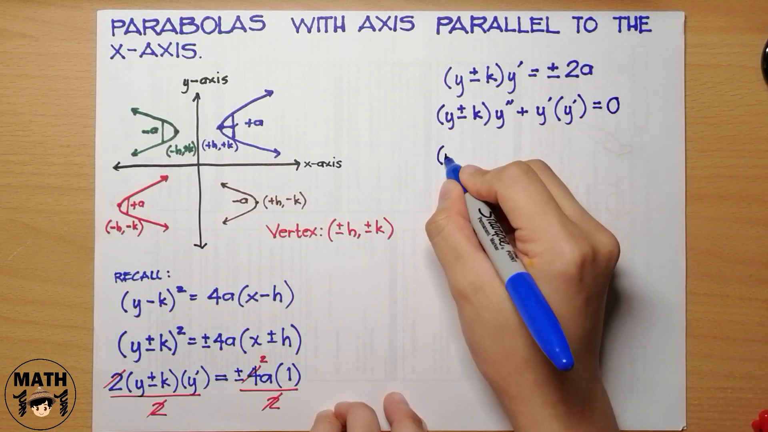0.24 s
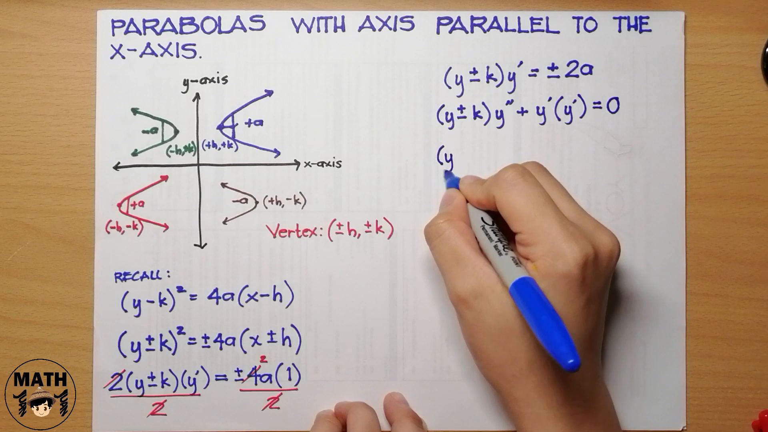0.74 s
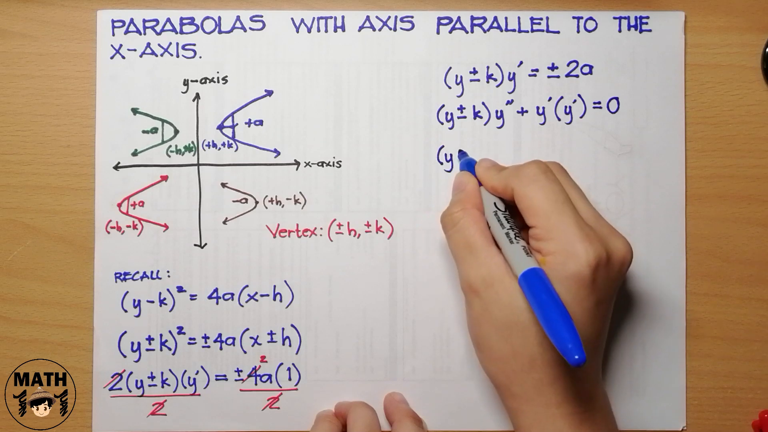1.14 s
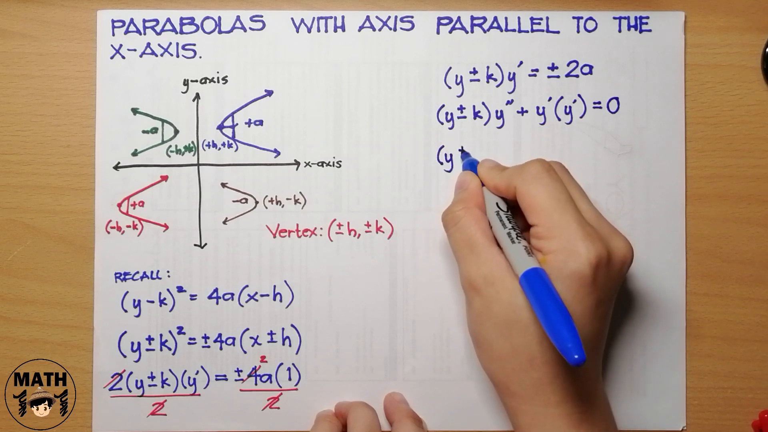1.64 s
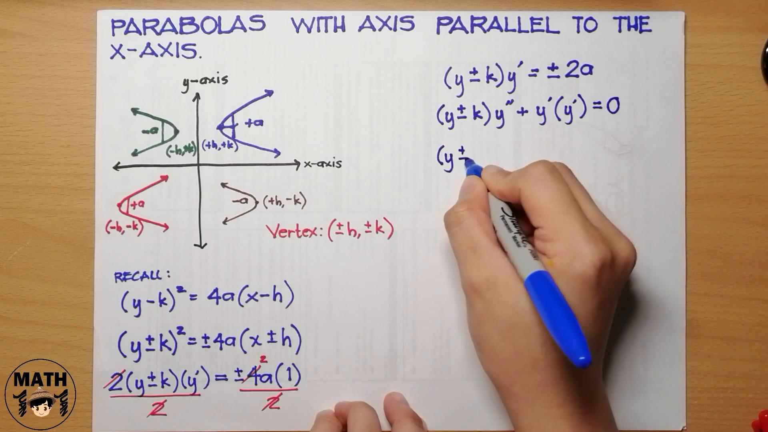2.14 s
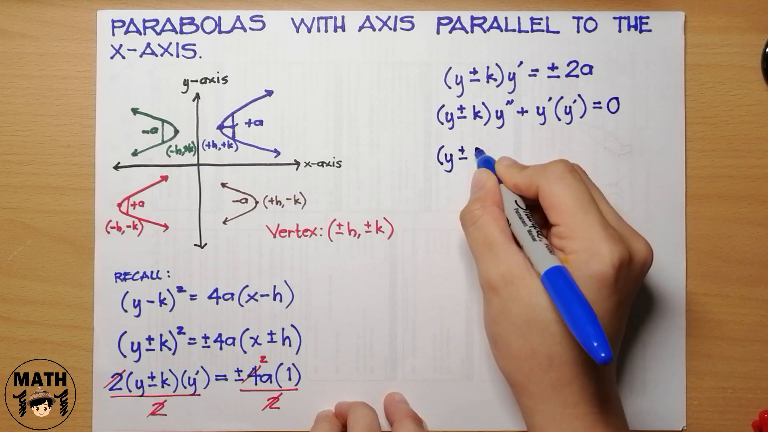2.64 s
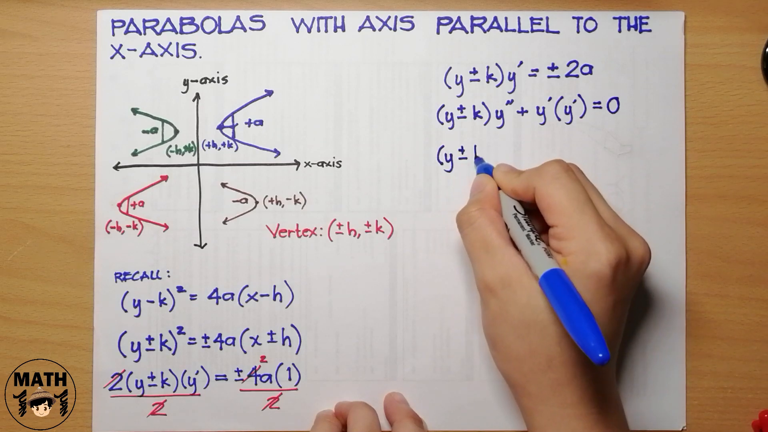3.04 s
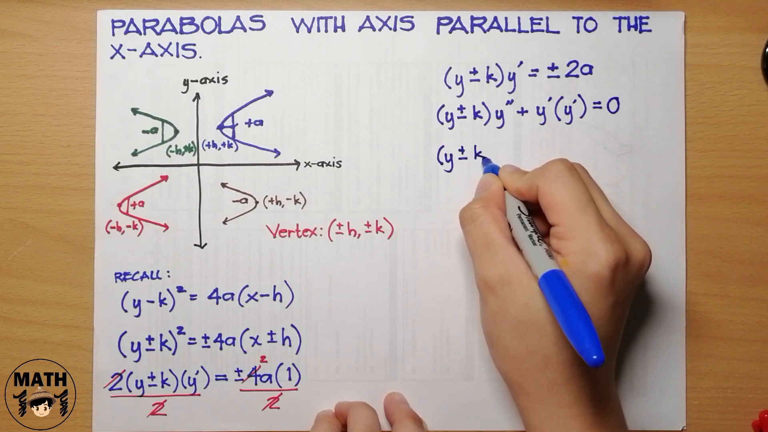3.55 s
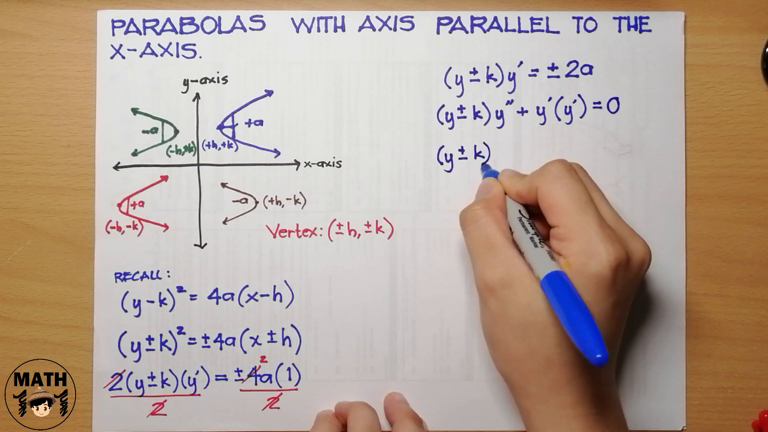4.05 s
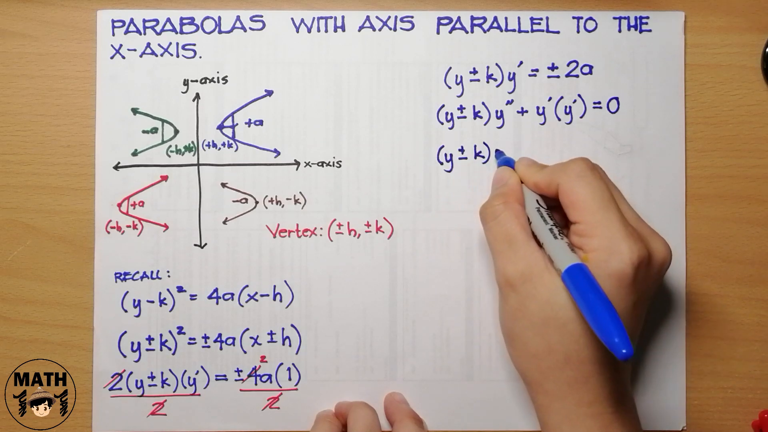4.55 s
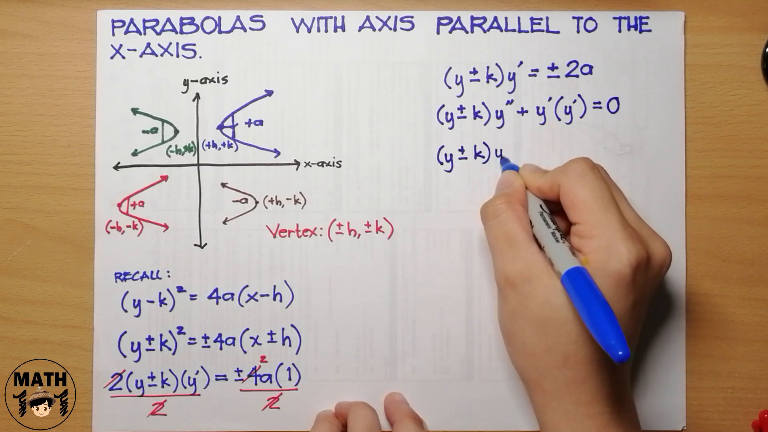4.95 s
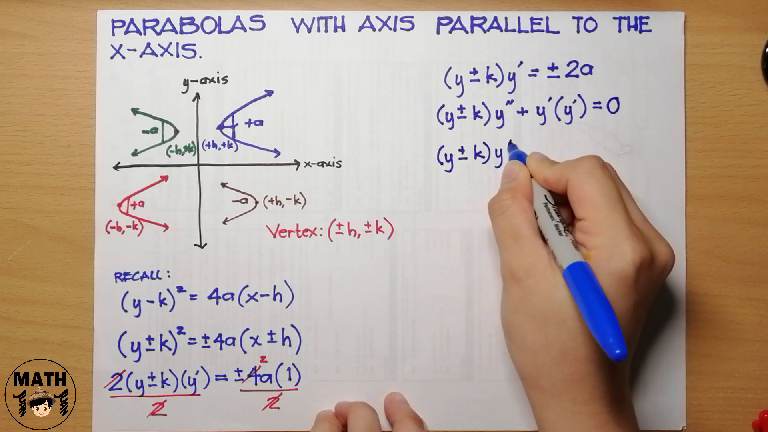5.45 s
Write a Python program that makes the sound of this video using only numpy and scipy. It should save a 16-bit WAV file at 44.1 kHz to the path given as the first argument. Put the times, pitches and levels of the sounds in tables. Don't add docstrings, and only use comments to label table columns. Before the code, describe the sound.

A felt-tip marker makes short, dry, scratchy strokes on paper over a desk, with small ticks, soft hand thumps and a low steady hum.

```python
import sys
import numpy as np
from scipy import signal
from scipy.fft import rfft, irfft, next_fast_len
from scipy.io import wavfile
from scipy.ndimage import uniform_filter1d, map_coordinates

SR = 44100
rng = np.random.default_rng(int(sys.argv[2]) if len(sys.argv) > 2 else 0)


def inscribe(sig):
    pcm = np.round(np.clip(np.atleast_2d(sig).T, -1, 1) * 32767)
    wavfile.write(sys.argv[1], SR, pcm.astype(np.int16))


def boost_factor(decibels):
    exponent = np.asarray(decibels, float) / 20
    return 10 ** exponent


N = 250652


def unit(x):
    return x / np.sqrt(np.mean(x ** 2) + 1e-20)


def along(points, hz):
    f, level_db = np.transpose(points)
    return boost_factor(np.interp(np.log(hz + 1), np.log(f + 1), level_db))


def wobble(rate):
    knots = rng.standard_normal(int(N * rate / SR) + 4)
    return map_coordinates(knots, [np.arange(N) * rate / SR])


def filtered(x, response):
    m = next_fast_len(N + SR // 2)
    return irfft(rfft(x, m) * response(np.fft.rfftfreq(m, 1 / SR)), m)[..., :N]


def modes(table, f):
    return sum(boost_factor(db) * 1j * f * w / (c * c - f * f + 1j * f * w) for c, w, db in table)


# (frequency [Hz], width [Hz], level [dB])
BARREL_MODES = [(532.6, 19, -4), (750, 89, -2.5), (1099, 36, 1.5), (1306, 26, 1), (1400, 53, -0.5),
                (1714, 50, -1), (2134, 160, -1.5), (2515, 18, -2.5), (3052, 310, -3.5), (3330, 97, -5.5),
                (4265, 68, -4.5)]
# (frequency [Hz], level [dB])
BROAD_SCRAPE = [(400, -37.5), (700, -1.5), (1500, -11), (2500, -16.5), (3800, -7), (5000, -51), (8000, -22)]


def barrel(f):
    return modes(BARREL_MODES, f) + along(BROAD_SCRAPE, f)


# (frequency [Hz], density [dB per Hz])
FELT_SPECTRUM = [(2500, -30), (3500, -3), (4400, -1.5), (4850, -16.5), (5450, -2.5), (5900, -13.5),
                 (6500, -1.5), (8000, -10), (8700, -3), (10500, -7.5), (13500, -7), (14500, -13),
                 (15600, -7.5)]


def felt(f):
    return along(FELT_SPECTRUM, f)


def fibres(spread_db, clump_db, patchy_db):
    clumping = clump_db * wobble(180) + clump_db * wobble(40)
    size = boost_factor(spread_db * rng.exponential(size=N) + clumping)
    spectrum = signal.stft(size * rng.standard_normal(N), nperseg=512)[2]
    patches = uniform_filter1d(rng.standard_normal(spectrum.shape), size=3, axis=0)
    patches = uniform_filter1d(patches, size=9, axis=1)
    return unit(signal.istft(spectrum * boost_factor(patchy_db * unit(patches)), nperseg=512)[1][:N])


# (start [s], length [s], pressure [dB], speed at start [dB], speed at end [dB])
STROKES = [(-.02, .095, -59.5, 1.5, 6), (0.077, 0.098, -58, 0.5, -12), (0.665, 0.06, -58, -11, -5),
           (0.721, 0.08, -61, -3, -18), (0.798, .035, -59.5, -5.5, 9), (.835, 0.097, -62, 10.5, -9),
           (1.011, 0.11, -55.5, -6.5, 1), (1.122, 0.046, -54.5, 1.5, 4.5), (1.181, 0.027, -56, 10, 13.5),
           (1.721, 0.06, -55.5, -1.5, -19), (2.081, 0.077, -59, -4, -4), (2.46, 0.074, -55, 10.5, -3),
           (2.651, 0.058, -68, 4.5, -8), (3.299, 0.054, -58, -8, 1.5), (3.353, 0.078, -58.5, 5.5, -15),
           (3.672, 0.074, -64, 9, -1.5), (3.853, 0.056, -58.5, -13, -3), (3.909, 0.058, -57, 0.5, -14.5),
           (4.279, 0.072, -57.5, -13, -11), (4.328, 0.162, -57.5, -8, 9.5), (5.086, 0.098, -58, -0.5, -16),
           (5.188, 0.12, -63, 7.5, -2), (5.356, 0.08, -58, -9, -3.5), (5.434, 0.12, -60, -4.5, 12.5)]
# (time [s], upright [dB], grip [dB])
HOLD = [(0, 11.5, -5), (.07, -0.5, -3.5), (.18, 2, 3), (.7, 6, -2), (.84, 0, 3), (1.16, -2, -7),
        (1.2, 3, 8), (2.12, 5, 2.5), (2.5, -0.5, 2.5), (3.34, -2.5, 1), (3.4, 4, 2), (3.93, 2, 3.5),
        (4.31, 2, 4), (4.45, -7, -4.5), (5.1, 1.5, 1.5), (5.25, 2, 3), (5.42, -5, 1), (5.56, 0.5, 1.5)]
LAND_S, LIFT_S = 0.023, 0.019
LAND_SHORTENS, LAND_BEND = 0.36, 0.82
LOW_DB, UPPER_DB = -6, -6.5
LOW_GROWS, SCRAPE_GROWS, UPPER_GROWS = 0.13, 0.33, 0.32
FELT_DB = -63.5


def stroke_gains():
    t, gains = np.arange(N) / SR, np.zeros((4, N))
    hold_s, upright, grip = np.transpose(HOLD)
    upright_db = np.interp(t, hold_s, upright)
    grip_db = np.interp(t, hold_s, grip)
    for start, length, pressure_db, first_db, last_db in STROKES:
        land_s = LAND_S * boost_factor(-LAND_SHORTENS * first_db)
        land = np.clip((t - start) / land_s, 0, 1) ** LAND_BEND
        lift = np.clip(1 - (t - start - length) / LIFT_S, 0, 1)
        speed_db = np.interp(t, [start, start + length], [first_db, last_db])
        low_db = pressure_db + LOW_DB + LOW_GROWS * speed_db + upright_db
        middle_db = pressure_db + SCRAPE_GROWS * speed_db
        upper_db = pressure_db + UPPER_DB + UPPER_GROWS * speed_db + grip_db
        gains += land * lift * boost_factor((low_db, middle_db, upper_db, FELT_DB + speed_db))
    return gains


# (frequency [Hz], width [Hz], level [dB])
HISS_MODES = [(6860, 180, -11), (7910, 140, 0.5), (8670, 270, -5), (9740, 210, -9), (11080, 130, -9)]


def marker():
    *body_gains, hiss_gain = stroke_gains()
    slips = fibres(spread_db=2, clump_db=.8, patchy_db=1.3)
    under = lambda f, hz: 1 / (1 + (f / hz) ** 10)
    bands = (lambda f: barrel(f) * under(f, 1205),
             lambda f: barrel(f) * (under(f, 2804) - under(f, 1212)),
             lambda f: barrel(f) * (1 - under(f, 2530)))
    scrape = np.zeros(N)
    for gain, band in zip(body_gains, bands):
        scrape += filtered(gain * slips, band) / np.std(filtered(slips, band))
    fine_slips = fibres(spread_db=1.0, clump_db=-0.46, patchy_db=3.0)
    hiss = unit(filtered(fine_slips, lambda f: felt(f) * (0.59 + 1.5 * modes(HISS_MODES, f))))
    return scrape + hiss_gain * hiss


# (time [s], level [dB])
MACHINE_LOAD = [(0.0, -48), (0.09, -68), (0.17, -52), (0.3, -50), (0.33, -54.5), (1.0, -57.5),
                (1.14, -42.5), (1.34, -59), (1.74, -58.5), (1.79, -49), (2.2, -67), (2.24, -48),
                (2.56, -74.5), (2.62, -51), (4.44, -51), (4.89, -58), (5.01, -49), (5.68, -65.5)]
HUM_HZ = 32.47
FIRST_DB, FIRST_SWAY_DB, SECOND_SWAY_DB = -54.5, 2, 2.4


def hum():
    s, second_db = np.transpose(MACHINE_LOAD)
    t = np.arange(N) / SR
    turn = 2 * np.pi * HUM_HZ * t
    load_db = np.interp(t, s, second_db)
    first = boost_factor(FIRST_DB + FIRST_SWAY_DB * wobble(7)) * np.sin(turn + 0.39 * wobble(3.88))
    second = boost_factor(load_db + SECOND_SWAY_DB * wobble(7)) * np.sin(2 * turn + 0.82 * wobble(6))
    fourth_db = -72 + 0.55 * (load_db - load_db.mean()) + 3.0 * wobble(6)
    fourth = boost_factor(fourth_db) * np.sin(4 * turn + 1.74 * wobble(8))
    return np.sqrt(2) * (first + second + fourth)


# (frequency [Hz], density [dB per Hz])
AIR_SPECTRUM = [(12, -31), (20, 9), (75, 0.5), (84, -1), (92, -13), (141, -13), (176, -24), (225, -24.5),
                (248, -25), (303, -29.5), (426, -34), (575, -44), (600, -43), (780, -59), (1320, -120)]
# (frequency [Hz], density [dB per Hz])
MIC_SPECTRUM = [(300, -18), (450, -9.5), (800, -4), (1500, -5), (3000, -5.5), (4200, -7), (4900, -12.5),
                (5600, -9.5), (8000, -11.5), (12000, -12), (14000, -12), (15600, -14.5)]
RUMBLE_DB, AIR_DB, HISS_DB = -56.5, -62.5, -67.5


def room():
    deep = lambda f: 1 / (1 + (f / 92) ** 8)
    low_cut = lambda f: 1 / (1 + (48 / (f + 1)) ** 3)
    noise = boost_factor(1.72 * wobble(6.076)) * rng.standard_normal(N)
    rumble = unit(filtered(noise, lambda f: along(AIR_SPECTRUM, f) * deep(f) * low_cut(f)))
    air = unit(filtered(noise, lambda f: along(AIR_SPECTRUM, f) * (1 - deep(f))))
    hiss = unit(filtered(rng.standard_normal(N), lambda f: along(MIC_SPECTRUM, f)))
    moving_air = boost_factor(RUMBLE_DB) * rumble + boost_factor(AIR_DB + 0.49 * wobble(1.65)) * air
    return moving_air + boost_factor(HISS_DB + 0.059 * wobble(1.9)) * hiss


# (time [s], peak [dB], frequency [Hz], t60 [s])
TAPS = [(.330, -46.5, 3950, 0.0094), (0.331, -52, 2860, .02), (.331, -51, 1020, 0.013),
        (.422, -61, 1400, .03), (.434, -60, 810, .03), (0.447, -54.5, 1335, 0.03),
        (.452, -54.5, 644, 0.029), (.452, -61, 2210, 0.022), (.557, -47.5, 2160, 0.027),
        (0.556, -46.5, 1412, 0.035), (.558, -49.5, 750, 0.03), (.582, -60, 6460, .02),
        (.921, -44.5, 3630, 0.025), (.921, -64, 1400, 0.026), (1.728, -55, 1700, 0.036),
        (3.511, -60, 3340, .03), (3.682, -51.5, 1690, 0.048), (5.093, -60, 1660, 0.035)]
# (time [s], peak [dB], bright part re peak [dB], t60 [s])
CRACKS = [(0.33, -43.5, -18, 0.041), (0.558, -44, -27, 0.041), (0.921, -38.5, -30, 0.04),
          (1.288, -44.5, -7, 0.047), (1.619, -51, -1, 0.037), (1.728, -37, -37, 0.046),
          (2.808, -49, -12, 0.16), (3.51, -52.5, 7, 0.03), (3.681, -45, 0, 0.025), (4.559, -55, -4, 0.039),
          (4.599, -51, -2.5, 0.045)]


def ticks():
    dull, bright, rings = np.zeros((3, N + SR))
    t = np.arange(SR // 10) / SR
    fade = lambda db, t60: boost_factor(db - 60 * t / t60) * (1 - np.exp(-t / 0.00029))
    for s, db, hz, t60 in TAPS + creak():
        rings[round(s * SR):][:len(t)] += fade(db, t60) * np.sin(2 * np.pi * hz * t)
    puffs = rng.standard_normal((len(CRACKS), 2, len(t)))
    for (s, db, bright_db, t60), puff in zip(CRACKS, puffs):
        dull[round(s * SR):][:len(t)] += 0.67 * fade(db, t60) * puff[0]
        bright[round(s * SR):][:len(t)] += 1.3 * fade(db + bright_db, t60) * puff[1]
    return rings[:N] + filtered(dull[:N], barrel) + filtered(bright[:N], felt)


CREAK_S, CREAK_DB, CREAK_HZ, CREAK_T60 = .343, -47, 2780, .013
SLIP_GAP_S, SLIP_LOSS_DB, SLIP_SAG_HZ, SLIP_SCATTER_HZ = .009, 3, 55, 170


def creak():
    slips = []
    for k, (late, off) in enumerate(rng.standard_normal((5, 2))):
        s = CREAK_S + SLIP_GAP_S * (k + 0.15 * late)
        hz = CREAK_HZ - SLIP_SAG_HZ * k + SLIP_SCATTER_HZ * off
        slips.append((s, CREAK_DB - SLIP_LOSS_DB * k, hz, CREAK_T60))
    return slips


# (time [s], peak [dB], ring [Hz], t60 [s])
THUMPS = [(.44, -60, 365, 0.089), (0.597, -60.5, 188, 0.098), (0.902, -49, 144, 0.11),
          (0.917, -44.5, 207, 0.062), (0.935, -60, 228, .06), (.922, -52.5, 370, 0.13),
          (0.925, -57, 293, 0.11), (3.386, -57.5, 349, .12), (3.628, -51, 150, 0.11),
          (4.248, -61, 230, 0.19), (5.022, -48.5, 170, 0.086), (5.272, -72, 180, .1)]


def thumps():
    out, t = np.zeros(N + SR), np.arange(SR // 4) / SR
    for s, db, hz, t60 in THUMPS:
        fade = boost_factor(db - 60 * t / t60) * (1 - np.exp(-t / 0.0014))
        ring = np.sin(2 * np.pi * hz * t) + 0.67 * np.sin(2 * np.pi * 0.925 * hz * t)
        out[round(s * SR):][:len(t)] += fade * ring
    return out[:N]


def walls(x):
    t = np.arange(SR // 4) / SR
    tail = rng.standard_normal(len(t)) * boost_factor(-60 * t / 0.18)
    return signal.fftconvolve(x, tail / np.linalg.norm(tail))[:N]


def scene():
    near = marker() + ticks() + thumps()
    return (near + boost_factor(-10.0) * walls(near) + hum() + room())[None]


# (frequency [Hz], width [Hz], depth [0-1])
PORT_NOTCH = (10380, 130, .85)
TOP_HZ = 15720


def microphone(x):
    hz, width, depth = PORT_NOTCH
    return filtered(x, lambda f: (f < TOP_HZ) * (1 - depth / (1 + ((f - hz) / width) ** 2)))


# (time [s], lowest frequency [Hz], share of bands lost below 3300 Hz, .2 more above [0-1],
# half length [s])
GAPS = [
    (.528, 400, .65, .011),
    (1.318, 600, .45, .008),
    (1.539, 450, .6, .018),
    (2.432, 4500, .65, .009),
    (3.36, 3300, .35, .008),
    (3.432, 3500, .6, .009),
    (3.758, 500, .5, .009),
    (4.243, 500, .6, .011),
    (4.707, 1200, .6, .01),
    (5.29, 600, .4, .009),
]


def spectral_gaps(x):
    out, reach = x.copy(), 2048
    t, f = np.arange(-reach, reach) / SR, np.fft.rfftfreq(2 * reach, 1 / SR)
    band = (56 * np.log10(1 + f / 900)).astype(int)
    draws = rng.uniform(size=(len(GAPS), 80))
    for (s, low_hz, share, half), draw in zip(GAPS, draws):
        near = slice(round(s * SR) - reach, round(s * SR) + reach)
        silent = (f > low_hz) * (draw[band] < share + .2 * (f > 3300))
        lost = irfft(rfft(x[:, near]) * silent)
        out[:, near] -= .95 * np.exp(-np.abs(t / half) ** 3) * lost
    return out


def top_cut(x):
    return signal.sosfilt(signal.butter(12, 15700, fs=SR, output="sos"), x)


def record(dry):
    mix = spectral_gaps(microphone(dry))
    return top_cut(mix)


dry = scene()
out = record(dry)
inscribe(out)
```